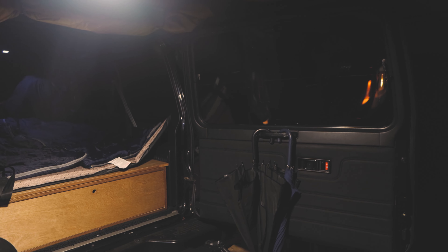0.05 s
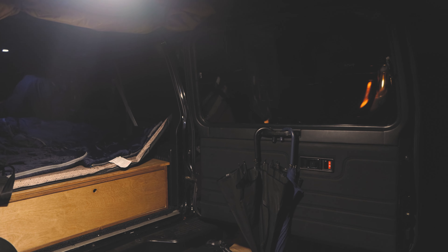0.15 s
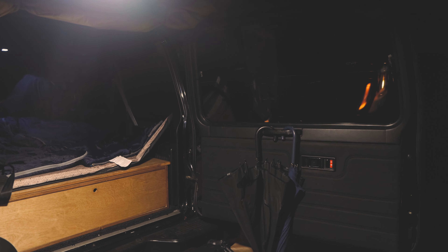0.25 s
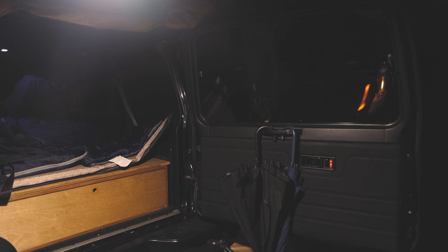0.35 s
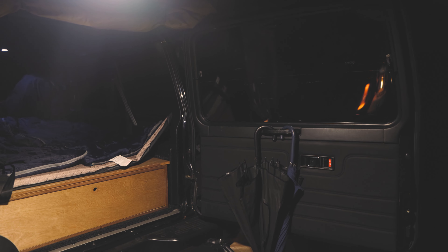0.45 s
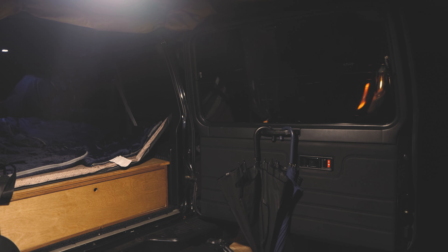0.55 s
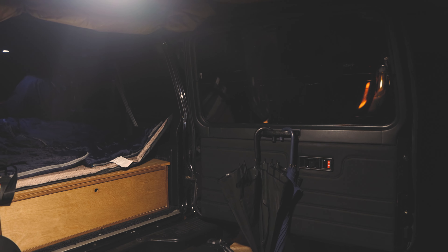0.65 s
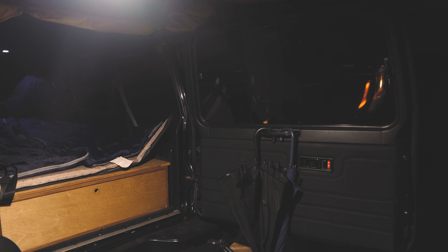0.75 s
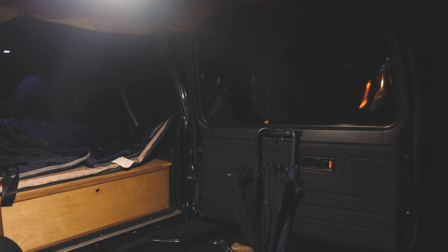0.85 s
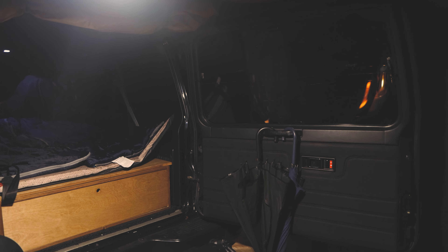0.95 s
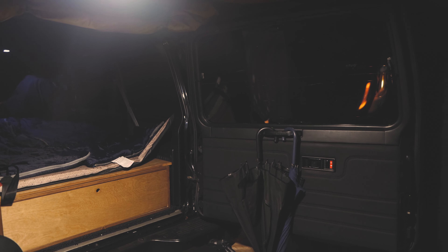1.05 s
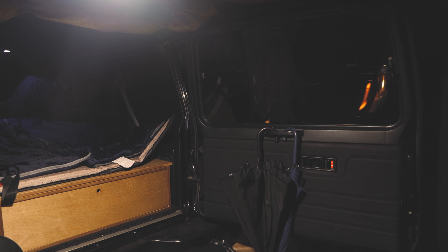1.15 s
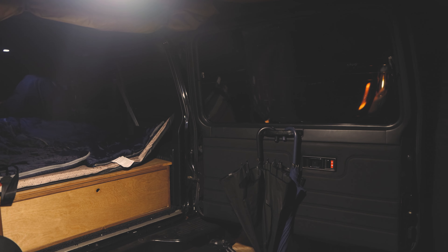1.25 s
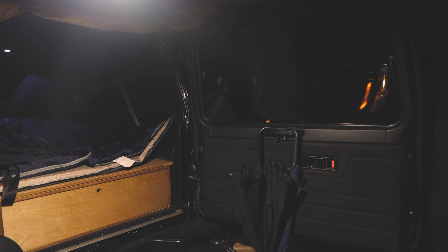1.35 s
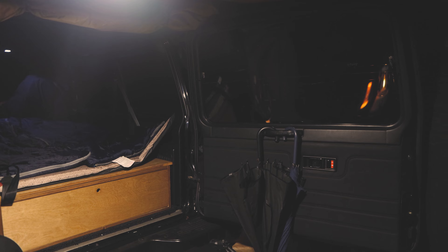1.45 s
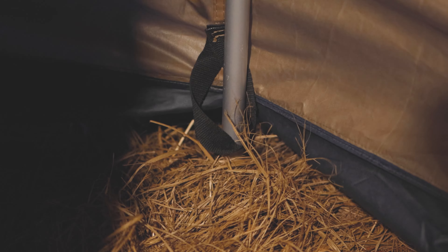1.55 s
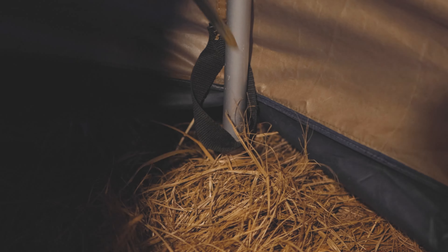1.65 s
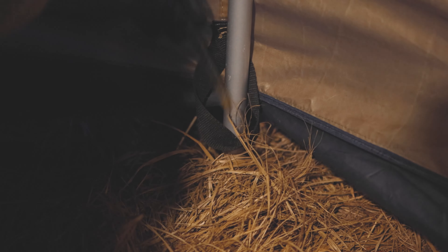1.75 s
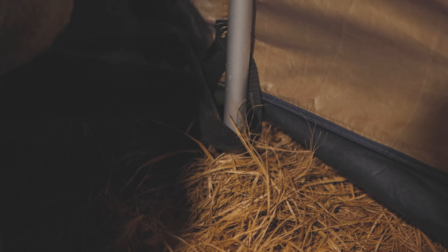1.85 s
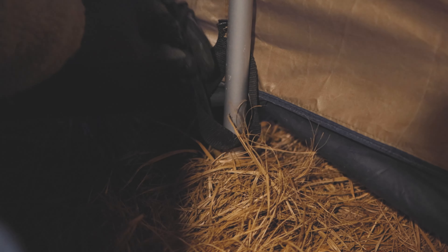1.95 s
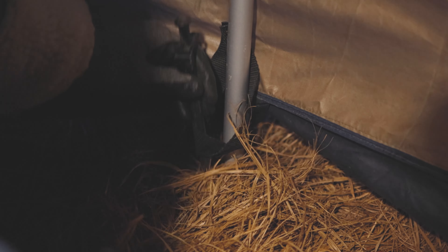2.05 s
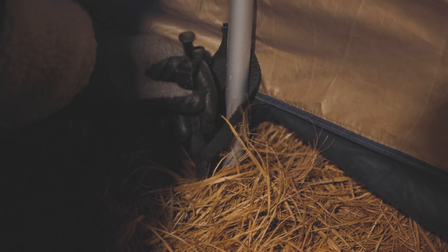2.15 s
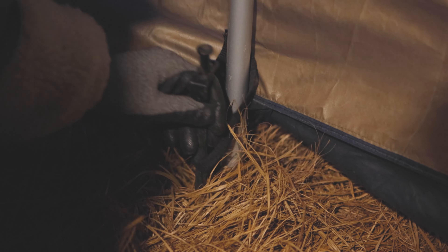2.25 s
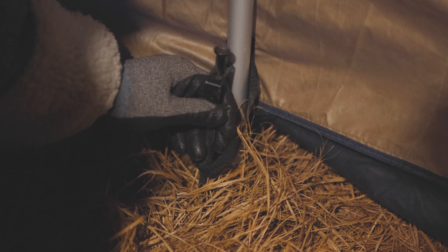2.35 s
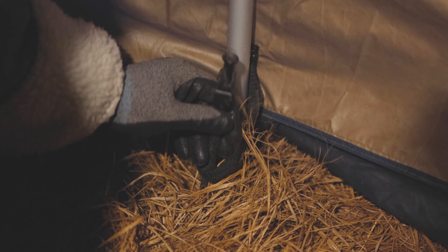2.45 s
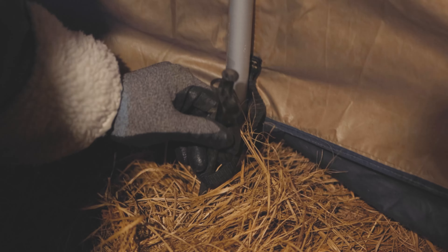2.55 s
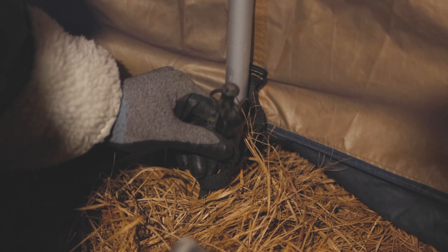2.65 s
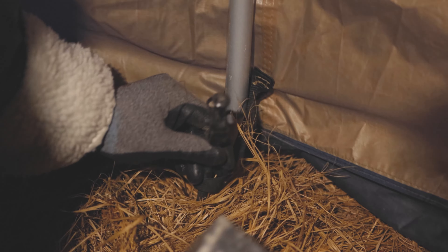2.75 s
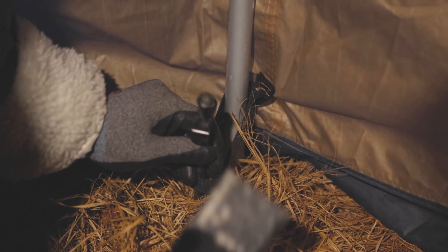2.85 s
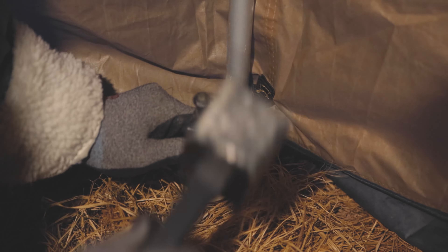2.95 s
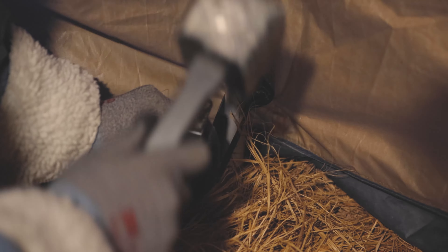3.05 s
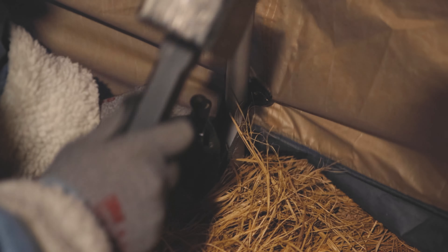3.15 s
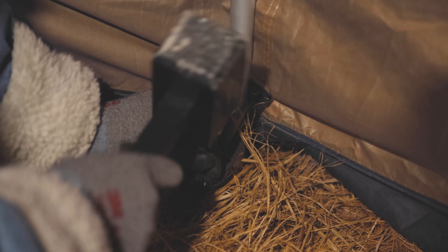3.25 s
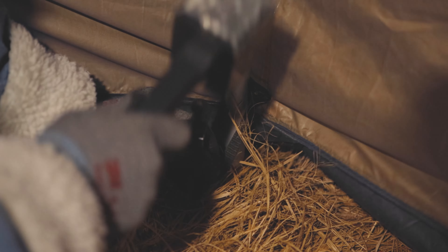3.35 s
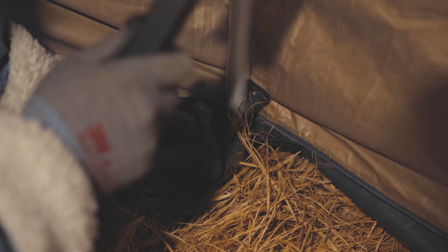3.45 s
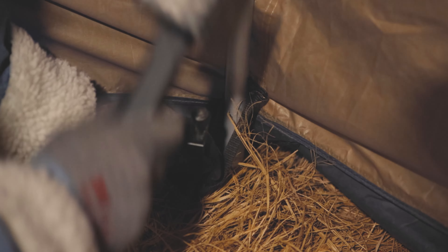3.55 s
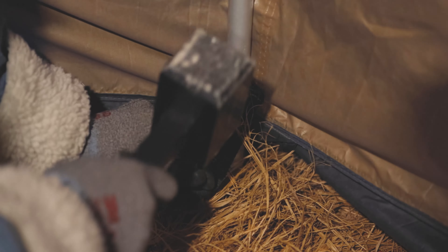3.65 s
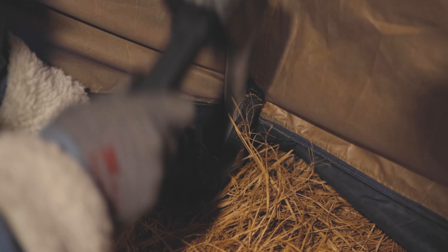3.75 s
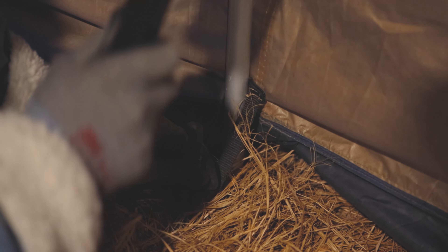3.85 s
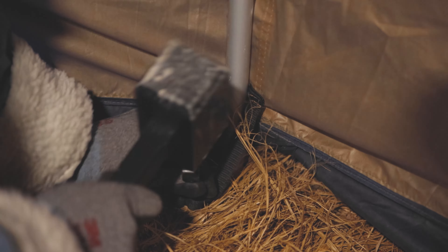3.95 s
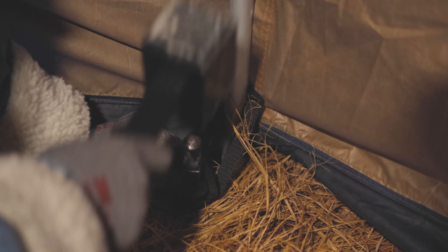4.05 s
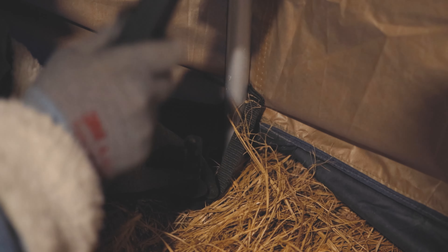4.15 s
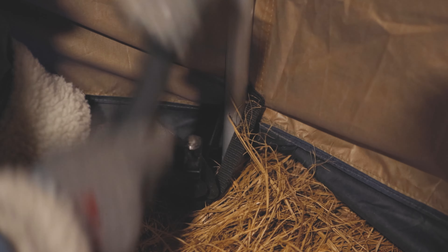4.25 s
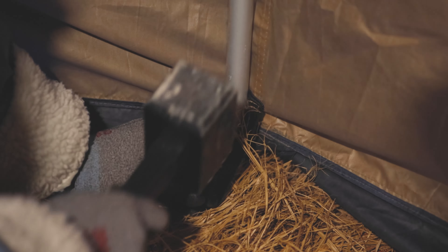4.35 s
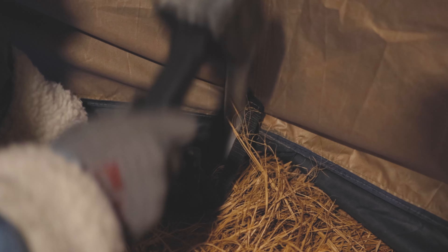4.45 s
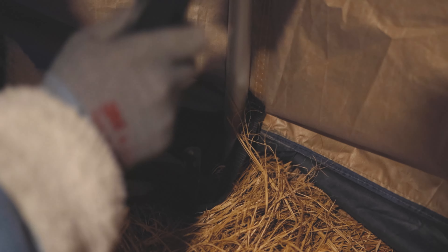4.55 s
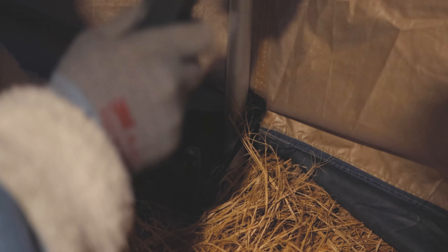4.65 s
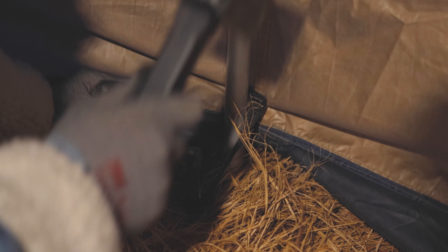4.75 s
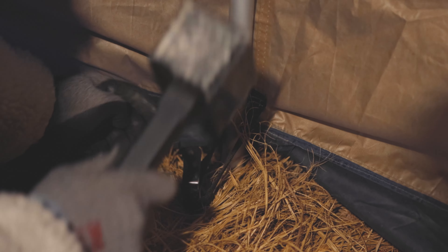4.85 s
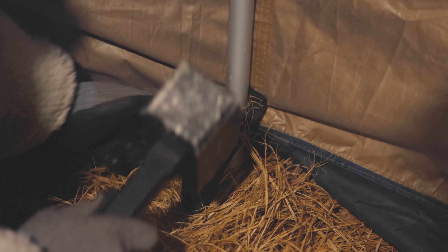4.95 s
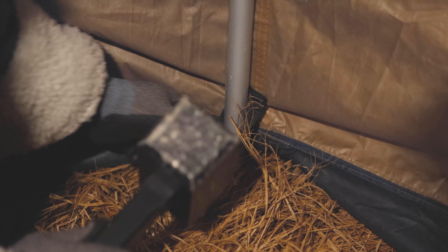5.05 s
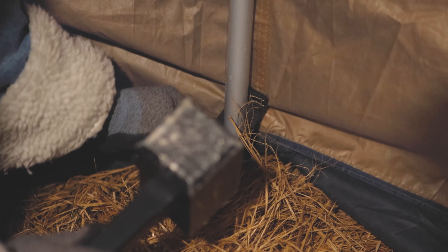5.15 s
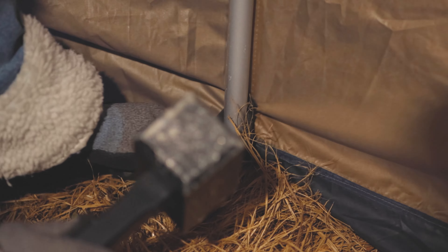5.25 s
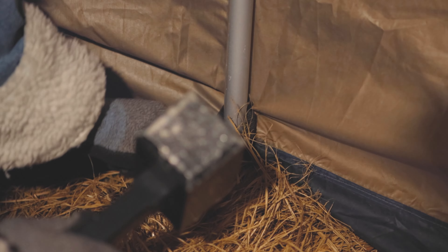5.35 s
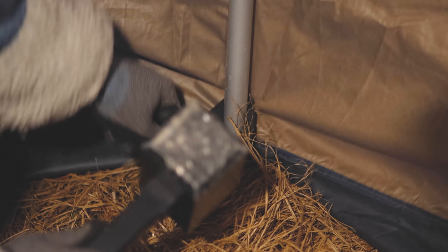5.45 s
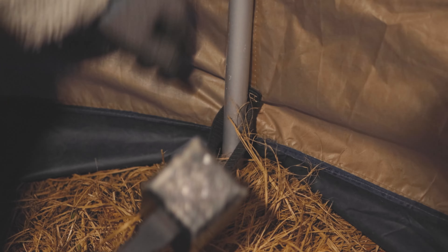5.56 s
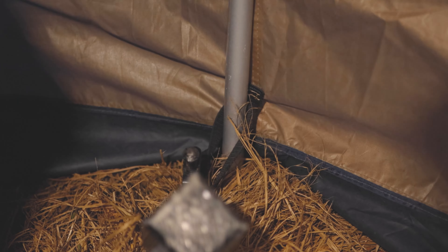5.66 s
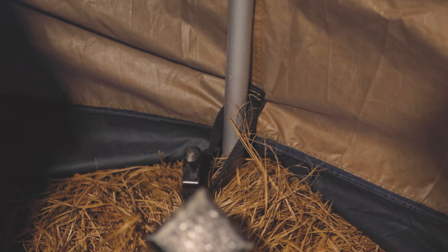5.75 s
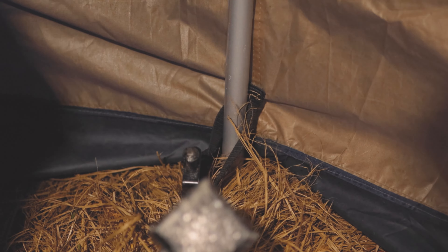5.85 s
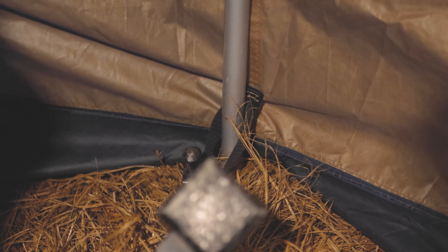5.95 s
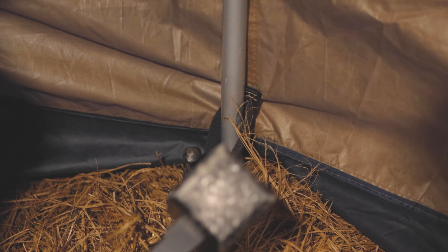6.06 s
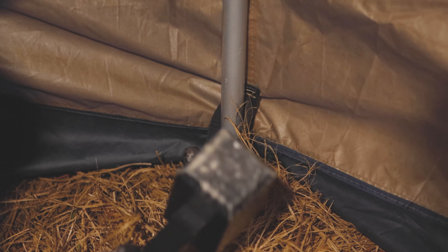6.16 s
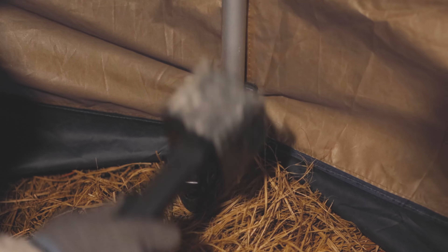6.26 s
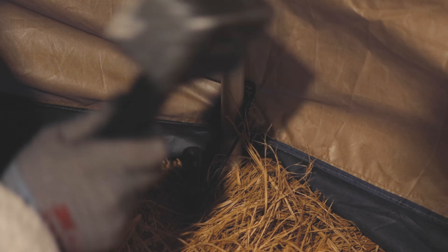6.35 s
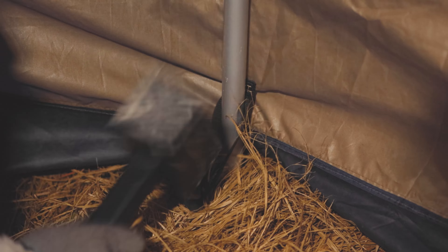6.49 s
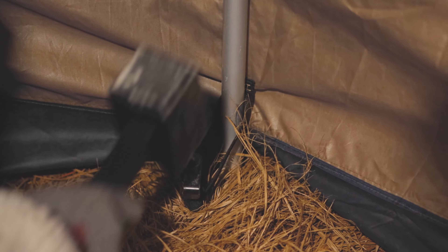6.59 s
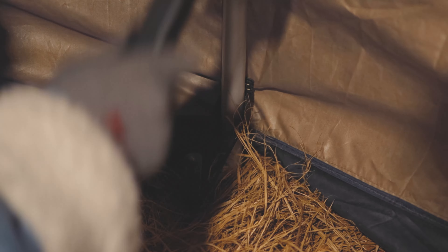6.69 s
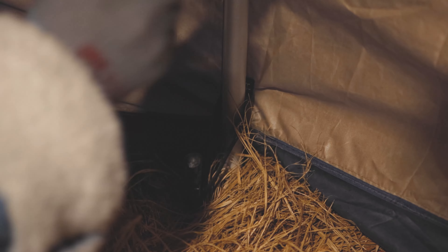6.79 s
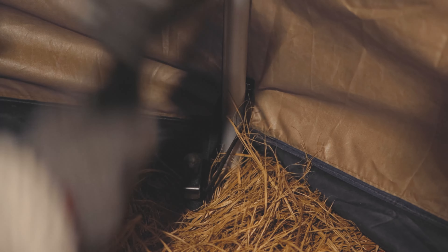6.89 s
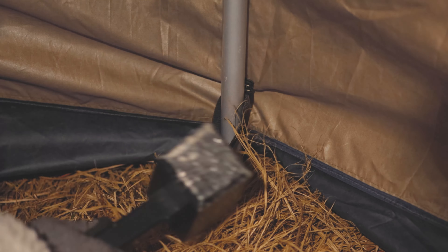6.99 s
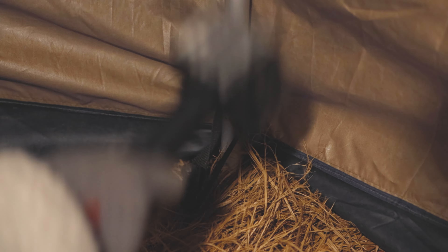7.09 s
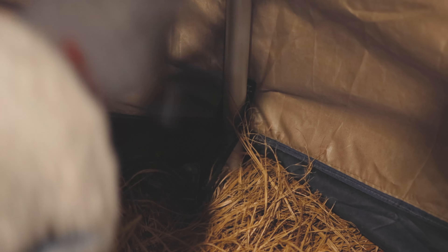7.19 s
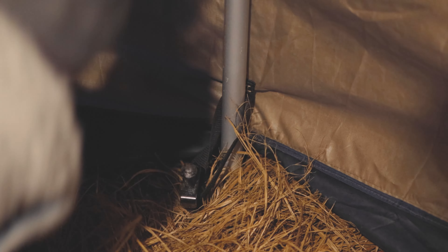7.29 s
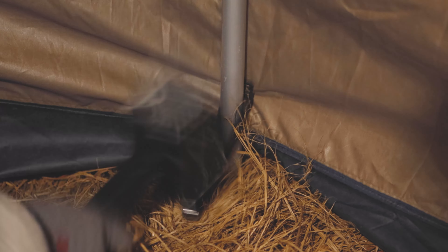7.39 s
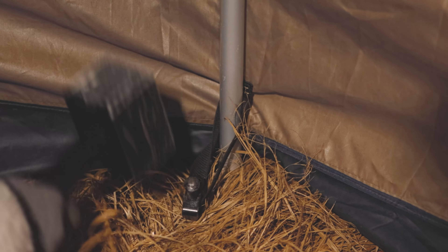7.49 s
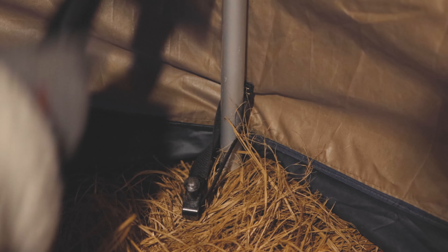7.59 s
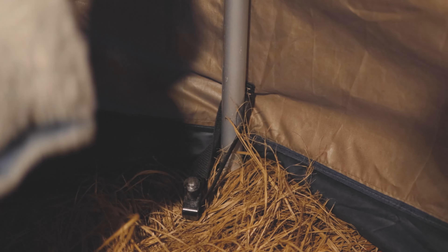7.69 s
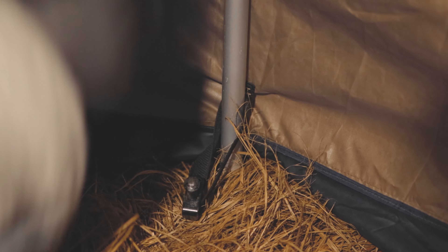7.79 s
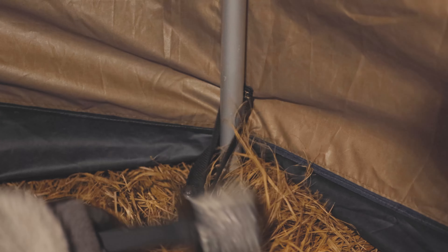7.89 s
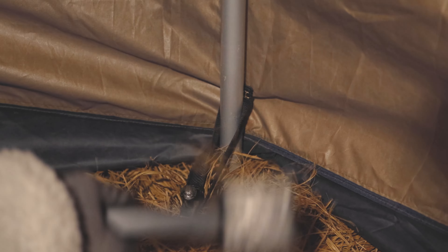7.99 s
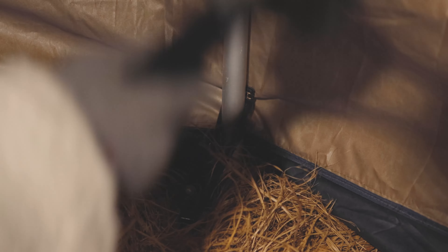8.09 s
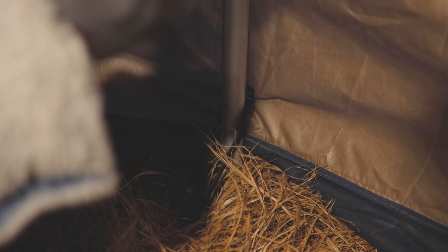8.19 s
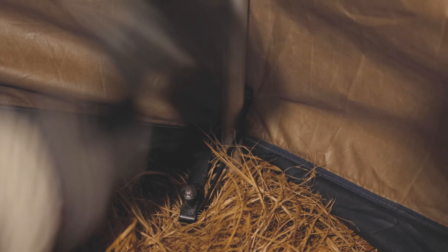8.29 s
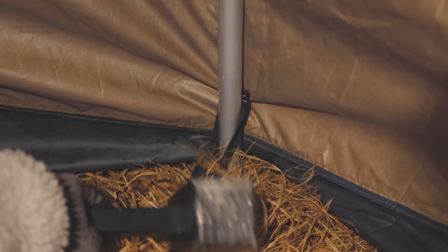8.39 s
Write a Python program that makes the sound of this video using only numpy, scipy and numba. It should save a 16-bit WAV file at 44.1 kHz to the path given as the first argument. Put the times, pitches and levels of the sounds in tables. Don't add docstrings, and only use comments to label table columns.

```python
import sys
import numpy as np
from scipy import signal
from scipy.fft import rfft, irfft, next_fast_len
from scipy.io import wavfile
from scipy.ndimage import uniform_filter1d
from numba import njit

SR = 44100
rng = np.random.default_rng(int(sys.argv[2]) if len(sys.argv) > 2 else 0)


def amplitude_ratio(level_db):
    exponent = np.asarray(level_db, float) / 20
    return 10 ** exponent


def generate_wav(signal):
    frames = np.transpose(np.atleast_2d(signal))
    scaled = np.clip(frames, -1, 1) * 32767
    pcm = np.round(scaled).astype(np.int16)
    wavfile.write(sys.argv[1], SR, pcm)


N = 371718
CUT_S = 1.553
RING_LENGTH = 6000

# [t/s, peak level/dB, mallet ring level/dB, thud level/dB, crack level/dB]
BLOWS = [
    (3.3402, -7.5, -12.5, -22.5, -11),
    (3.7086, -8.5, -13.5, -25, -20),
    (4.0583, -7.5, -16, -33, -24),
    (4.4066, -5, -22, -30.5, -18),
    (6.6099, -10.5, -19, -23, -5),
    (7.0541, -6.5, -19, -27, -8),
    (7.5121, -8.5, -24, -23, -6),
    (7.9861, -9.5, -16, -24.5, -3.5),
]


def curve(table, column):
    rows = np.array(table)
    return np.interp(np.arange(N) / SR, rows[:, 0], rows[:, column])


def coloured(x, colour):
    hz, db = np.transpose(colour)
    size = next_fast_len(len(x))
    log_hz = np.log(np.maximum(np.arange(size // 2 + 1) * SR / size, 1))
    gain = amplitude_ratio(np.interp(log_hz, np.log(hz), db, left=-90, right=-90))
    y = irfft(rfft(x, size) * gain, size)[:len(x)]
    return y / np.std(y)


def walk(rate):
    k = int(SR / rate)
    held = np.repeat(rng.standard_normal(N // k + 1), k)
    return 1.23 * uniform_filter1d(uniform_filter1d(held, k), k)[:N]


def grains(rate, spread_db, smear_s):
    sizes = amplitude_ratio(spread_db * np.minimum(rng.exponential(size=N), 4))
    starts = (rng.random(N) < rate / SR) * sizes
    swell = signal.lfilter([1], [1, -np.exp(-1 / (smear_s * SR))], starts)
    return swell * rng.standard_normal(N)


def ring(modes, scale, scatter_db, wander):
    hz, db, t60 = np.transpose(modes)[:, :, None]
    size = amplitude_ratio(db + scatter_db * rng.standard_normal((len(modes), 1)))
    t = np.arange(RING_LENGTH) / SR
    drift = wander * np.cumsum(rng.standard_normal((len(modes), RING_LENGTH)), axis=1)
    phase = 2 * np.pi * hz * scale * t + drift
    return np.sum(size * np.exp(-np.log(1000) * t / t60) * np.sin(phase), axis=0)


def burst(hz, width, decay_s):
    edges = np.clip([hz / width, hz * width], 20, .45 * SR)
    noise = rng.standard_normal(RING_LENGTH) * np.exp(-np.arange(RING_LENGTH) / (decay_s * SR))
    y = signal.sosfilt(signal.butter(3, edges, "band", fs=SR, output="sos"), noise)
    return y / np.max(np.abs(y))


def add(out, s, x):
    i = int(s * SR)
    out[i:i + len(x)] += x[:len(out) - i]


def after(times, db, fade_s):
    kicks = np.zeros(N)
    np.add.at(kicks, (np.asarray(times) * SR).astype(int), amplitude_ratio(db))
    return signal.lfilter([1], [1, -np.exp(-1 / (fade_s * SR))], kicks)


def chatter(layers, ms, count):
    when = np.sort(rng.random(count))
    size = rng.uniform(0.22, 1, count) * rng.choice([-1, 1], count)
    size[0] = 1
    taps = np.zeros((1, int(.03 * SR)))
    delays = (when - when[0]) * np.clip(ms, 1, 28) * SR / 1000
    np.add.at(taps[0], delays.astype(int), size)
    y = signal.fftconvolve(layers, taps, axes=1)
    return y / np.sqrt(2 * np.mean(y[:, :int(.007 * SR)] ** 2, axis=1, keepdims=True))


def night():
    # [t/s, level/dB]
    hush_levels = [(0, -56), (.45, -53.5), (1.1, -53), (1.55, -53.5)]
    # [f/Hz, density level/dB]
    hush_colour = [(15, -48), (25, -14.5), (134, -7), (276, -14), (615, -13.5), (1520, -17.5), (3660, -31),
                   (8150, -52), (9030, -52), (12000, -73), (15600, -87), (22000, -120)]
    side_db = -1
    mid = coloured(rng.standard_normal(N), hush_colour)
    side = coloured(rng.standard_normal(N), hush_colour)
    side = signal.sosfilt(signal.butter(2, 900, "high", fs=SR, output="sos"), side)
    wide = mid + amplitude_ratio(side_db) * side * np.array([[1], [-1]])
    level = amplitude_ratio(curve(hush_levels, 1) + 0.33 * walk(6.1))
    return wide * level * (np.arange(N) < CUT_S * SR)


def snaps():
    # [t/s, peak level/dB, centre f/Hz, body level/dB]
    cracks = [(0.3794, -51, 2120, -10), (0.7338, -40, 2270, -24), (1.5545, -21, 2500, -16),
              (1.7423, -4.5, 3120, -18.5), (1.77, -19, 3690, -16), (1.907, -24, 1100, -13),
              (1.93, -2.5, 2940, -27), (2.088, -30, 5950, -30), (3, -14, 2780, -16.5),
              (3.2, -19, 1310, -13), (3.2715, -18.5, 2910, -26), (3.4446, -6.5, 2650, -24),
              (5.012, -30.5, 1600, -9), (5.1864, -28, 2020, -10), (5.232, -29, 2500, -12),
              (5.2535, -29, 3000, -15), (5.265, -29, 2500, -10), (5.5858, -30, 1410, -11),
              (5.8911, -31, 1500, -12), (6.099, -32, 3000, -22), (6.628, -29, 450, 0),
              (6.642, -31.5, 450, 1), (7.104, -23, 2830, -12), (7.5652, -20, 2890, -10.5),
              (8.056, -30.5, 1410, -21)]
    # [t/s, starting f/Hz, pitch fall time/s, level/dB]
    cord_twang = (3.909, 1250, .035, -37)
    out = np.zeros(N)
    for s, db, hz, body_db in cracks:
        if s > CUT_S:
            tail = amplitude_ratio(-12.5) * burst(hz, 1.74, 0.0078)
        else:
            tail = amplitude_ratio(-7.5) * burst(hz, 2.0, 0.031)
        body = amplitude_ratio(body_db + 1.5) * burst(324, 2.17, 0.0044)
        add(out, s + 0.00046, amplitude_ratio(db + 4.0) * (burst(hz, 1.48, 0.00021) + tail + body))
    s, hz, fall_s, db = cord_twang
    fade = np.exp(-np.arange(RING_LENGTH) / (fall_s * SR))
    add(out, s, amplitude_ratio(db) * fade * np.sin(2 * np.pi * np.cumsum(hz * fade) / SR))
    return out


def hands():
    # [t/s, rustle level/dB, cloth sizzle level above rustle/dB]
    handling = [(1.56, -35.5, -5), (1.7, -39.5, -4.5), (1.92, -42, -4), (2.08, -49.5, -3.5),
                (2.55, -42.5, -9), (3.21, -33.5, -11), (3.36, -38.5, -7), (3.62, -39.5, -10),
                (3.85, -46, -7.5), (4.38, -44, -12), (4.53, -55, -9), (4.9, -47.5, -12.5),
                (5.25, -45.5, -11.5), (5.4, -35.5, -15.5), (5.62, -44.5, -9), (6.55, -45.5, -10.5),
                (7.0, -47.5, -9.5), (8.3, -50.5, -11.5)]
    # [t/s, level/dB]
    gusts = [(1.56, -38.5), (2.16, -45), (3.06, -37), (3.66, -44.5), (4.56, -48), (5.16, -45),
             (5.46, -39.5), (6.36, -39.5), (6.66, -43.5), (7.26, -43.5), (7.56, -46), (7.9, -41)]
    # [f/Hz, density level/dB]
    rustle_colour = [(120, -15), (200, 2), (242, -1), (392, -0.5), (729, -2), (1180, -1), (1550, -2.5),
                     (5000, -20), (6500, -28), (11000, -120)]
    # [f/Hz, density level/dB]
    sizzle_colour = [(2060, -5), (3500, -2.5), (4530, -4.5), (4920, -4), (10300, -16.5), (13400, -18),
                     (15400, -22), (16300, -28)]
    # [f/Hz, density level/dB]
    breeze_colour = [(12, -55), (20, -29), (66, -2), (108, 3.5), (202, -4.5), (236, -21), (268, -15),
                     (300, -24), (390, -45), (660, -120)]
    crackle = grains(1100, 2.4, 0.0021)
    crackle = crackle / np.std(crackle)
    patchy_db = 1.64 * walk(25)
    shake = after(np.array(BLOWS)[:, 0], -43.5, 0.06)
    rustle = amplitude_ratio(curve(handling, 1) + 2.5 + patchy_db + 0.46 * walk(12))
    sizzle = (amplitude_ratio(curve(handling, 1) + curve(handling, 2) + 2.2) + shake) * amplitude_ratio(patchy_db)
    low = coloured(crackle + 0.87 * rng.standard_normal(N), rustle_colour) * rustle
    high = coloured(crackle + 1.08 * rng.standard_normal(N), sizzle_colour) * sizzle
    swipe = swipes(crackle + 0.97 * rng.standard_normal(N))
    breeze_level = amplitude_ratio(curve(gusts, 1) + 0.2 + 2.56 * walk(6.4))
    breeze = coloured(rng.standard_normal(N), breeze_colour) * breeze_level
    return (low + high + swipe + breeze) * (np.arange(N) >= CUT_S * SR)


def swipes(grit):
    # [start t/s, fullest t/s, end t/s, level/dB]
    strokes = [
        (1.77, 1.8, 1.86, -39),
        (3.388, 3.466, 3.49, -30),
        (5.305, 5.466, 5.51, -38.5),
        (5.894, 5.96, 5.98, -30),
    ]
    # [f/Hz, density level/dB]
    stroke_colour = [(300, -36), (900, -2), (2000, 1.5), (5000, -5), (10000, -12.5), (15800, -15)]
    # [start t/s, end t/s, starting f/Hz, final f/Hz, level/dB]
    cord_zip = (5.895, 6, 261, 1901, -29.5)
    edge = 0.54
    t = np.arange(N) / SR
    swell = np.zeros(N)
    for start, full, end, db in strokes:
        swell += amplitude_ratio(db) * np.interp(t, [start, full, end], [0, 1, 0]) ** edge
    out = swell * coloured(grit, stroke_colour)
    start, end, from_hz, to_hz, db = cord_zip
    hz = np.linspace(from_hz, to_hz, int((end - start) * SR))
    phase = np.cumsum(2 * np.pi * hz / SR + 0.197 * rng.standard_normal(len(hz)))
    broken = amplitude_ratio(db + 5 * walk(154)[:len(hz)])
    add(out, start, broken * np.hanning(len(hz)) ** 0.23 * np.sin(phase))
    return out


def jingles():
    # [t/s, ring level/dB, clank level/dB, brightness level/dB]
    knocks = [(2.316, -24.5, -21, -11.5), (3.305, -13.5, -11, -8), (3.575, -16, -8, -3.5),
              (3.583, -26, -6, -0.5), (3.653, -26, -2, -1), (3.796, -37.5, 9.5, -17),
              (3.992, -25.5, -3, -11), (4.258, -34.5, -12, -6), (4.311, -28, 4.5, 3),
              (4.665, -22.5, -6, -9), (5.151, -31.5, -8, 0), (5.619, -24.5, -4.5, -14.5),
              (6.394, -34, 3, -11), (6.51, -18, -18, -33), (6.519, -28, -4, -21), (6.593, -18, 1, -22),
              (6.686, -31, 2.5, -3.5), (6.867, -26.5, -5, -0.5), (6.895, -31, -7, -12),
              (7.403, -24.5, -11, -14), (7.5231, -10, -10, -14), (7.565, -21.5, -24, -20),
              (7.744, -33.5, 3, -10), (7.894, -23, -4, -17), (7.912, -22, -18, -13), (7.961, -36.5, 6, 2),
              (8.183, -37, -4, -9), (8.358, -23.5, -13.5, -7.5)]
    # [t/s, ring level/dB, clank level/dB, brightness level/dB]
    drags = [(3.296, -20.5, 0, -8), (3.554, -29, -18, -27), (3.565, -27, -12, -3), (3.6, -42, -6, 3),
             (3.646, -25, -7, -15), (3.954, -33, -6, -21), (3.968, -22.5, -3, -3), (4.649, -30.5, -8, -9),
             (5.138, -27.5, -2, -9), (5.859, -38, -15, -11), (6.502, -29.5, -14, -10.5),
             (6.5823, -19, -2, -3.5), (6.854, -33, -1, -3), (6.861, -22, -9, -23), (7.043, -37.5, 9, -15),
             (7.239, -37, -4, -8.5), (7.369, -29.5, -2, -1), (7.501, -38.5, 9, -21), (7.615, -33.5, -2, -9),
             (7.626, -28.5, -6, -9.5), (7.649, -29.5, 0.5, -19), (7.874, -32, -5, -18),
             (7.881, -30.5, 0, -16), (8.055, -45, 11.5, 7), (8.105, -22, -10, -21), (8.328, -31.5, -4, -11)]
    # [t/s, ring level/dB]
    tinks = [(2.572, -30.5), (2.642, -34.5), (3.255, -25), (3.908, -37), (4.211, -41), (4.438, -41),
             (4.474, -38), (4.535, -47), (4.621, -36), (4.696, -32.5), (4.744, -34.5), (4.766, -47),
             (4.869, -29.5), (5.04, -39.5), (5.762, -38), (6.055, -33.5), (6.087, -34), (6.164, -44),
             (6.314, -34), (6.756, -34), (6.78, -30), (7.579, -33), (8.157, -30.5), (8.405, -36)]
    # [f/Hz, level/dB, t60/s]
    hook_modes = [(2917, -8, 0.071), (2981, -7, 0.033), (2890, -42, 0.054), (3210, -10, 0.014),
                  (3870, -27, 0.097)]
    # [f/Hz, level/dB, t60/s]
    upper_modes = [(6910, 5, 0.042), (7635, -0.5, 0.058)]
    # [f/Hz, level/dB, t60/s]
    top_modes = [(10840, -23, 0.19), (11880, -8.5, .03), (14000, -8, 0.055), (15000, -30, .03)]
    knock_ms, drag_ms, tink_ms = 2.4, 8, 3.2
    rebound_s, rebound = 0.012, (-15.5, -1, -16)
    tremble_db, tremble_fade_s, tremble_max_db, tremble_rest_db = -21, 0.1, -46, -72
    hits = [(blow[0] + rebound_s, *rebound, knock_ms) for blow in BLOWS[1:]]
    hits += [(*row, knock_ms) for row in knocks]
    hits += [(*row, drag_ms) for row in drags]
    hits += [(*row, -7, -20, tink_ms) for row in tinks]
    out = np.zeros(N)
    for s, db, clank_db, bright_db, ms in hits:
        shift = 1 + 0.0218 * rng.standard_normal()
        main = ring(hook_modes, shift, 6.1, 0.06)
        clank = burst(2260, 2.02, 0.0055)
        upper = ring(upper_modes, 0.97, 1.4, 0.16) + 0.32 * burst(4700, 1.33, 0.0014)
        top = ring(top_modes, 1, 10.0, 0.015) + 2.5 * burst(11400, 1.36, 0.0011)
        layers = np.array([main, clank, upper, top])
        gains = amplitude_ratio(db + np.array([-.3, clank_db - 2.5, bright_db - .4, bright_db - 6.5]))
        add(out, s, gains @ chatter(layers, 1.8 * ms, count=8))
    ticks = coloured(grains(200, 3.0, 0.0015), [(1800, -14), (2900, -12), (4600, -11)])
    hum = np.zeros(N)
    for hz, width_hz in [(2860, 74), (3000, 68)]:
        hum += signal.lfilter(*signal.iirpeak(hz, hz / np.clip(width_hz, 100, 300), SR), ticks)
    times, levels_db = np.transpose(hits)[:2]
    tremble = after(times, levels_db + tremble_db, tremble_fade_s) + amplitude_ratio(tremble_rest_db)
    tremble = np.minimum(tremble, amplitude_ratio(tremble_max_db)) * (np.arange(N) > 2.2 * SR)
    return out + tremble * hum / np.std(hum)


def squeaks():
    # [start t/s, end t/s, f/Hz, level/dB]
    whistles = [
        (2.332, 2.43, 12000, -56),
        (2.837, 2.87, 12100, -56),
        (3.445, 3.553, 12200, -52),
    ]
    # [start t/s, end t/s, level/dB]
    creaks = [
        (6.723, 6.745, -37),
        (6.793, 6.853, -40),
    ]
    out = np.zeros(N)
    for start, end, hz, db in whistles:
        noise = rng.standard_normal(int((end - start) * SR))
        whistle = signal.lfilter(*signal.iirpeak(hz, 30, SR), noise)
        add(out, start, amplitude_ratio(db + 19) * np.hanning(len(noise)) ** .4 * whistle)
    for start, end, db in creaks:
        gaps = .0028 + 0.0036 * rng.random(30)
        sizes = rng.standard_normal(30)
        for s, size in zip(start + np.cumsum(gaps) - gaps[0], sizes):
            if s < end:
                add(out, s, amplitude_ratio(db + 3 * size) * burst(11800, 1.3, 0.00037))
    return out


def blows():
    # [ratio to ring f, level/dB, t60/s]
    peg_modes = [(1, -6, 0.028), (0.88, -8, 0.0086), (1.2, -11, 0.02), (.985, -21.5, 0.12)]
    # [f/Hz, level/dB, t60/s]
    mallet_modes = [(12900, 0, .028), (13250, -8, .05), (14900, -14, .02), (10680, -38, .2)]
    # [f/Hz, level/dB, t60/s]
    ground_modes = [(63.7, 3, 0.09), (137, 6.5, 0.046), (337, 9, 0.023)]
    peg_hz, peg_rise_hz_per_s = 2928, 20.1
    out = np.zeros(N)
    for s, db, mallet_db, thud_db, crack_db in BLOWS:
        hz = peg_hz + peg_rise_hz_per_s * (s - BLOWS[0][0])
        hit = ring(peg_modes, hz, 0.58, 0.085)
        hit += amplitude_ratio(mallet_db) * ring(mallet_modes, 1.0, 0.77, 0.022)
        hit += amplitude_ratio(mallet_db - 25) * burst(13140, 1.045, 0.038)
        hit += amplitude_ratio(thud_db - 4.5) * ring(ground_modes, 1, 1.5, .03)
        hit += amplitude_ratio(thud_db + 23.5) * burst(1650, 2.64, 0.0023)
        hit += amplitude_ratio(crack_db - 0.5) * burst(5400, 2.87, 0.002)
        hit += amplitude_ratio(crack_db - 12.5) * burst(2300, 2.7, 0.017)
        add(out, s + 0.00033, amplitude_ratio(db + 15.5) * hit)
    return out


def scene():
    return night() + snaps() + hands() + jingles() + squeaks() + blows()


@njit
def follow(x, attack, release):
    e, out = 0., np.empty(len(x))
    for i in range(len(x)):
        e += (x[i] - e) * (attack if x[i] > e else release)
        out[i] = e
    return out


def top_cut(x):
    return signal.sosfilt(signal.butter(12, 16970, fs=SR, output="sos"), x)


def record(dry):
    ceiling = .45
    clipped = dry / (1 + np.abs(dry / ceiling) ** 4) ** .25
    level = follow(np.abs(clipped[0]), 1 / (.014 * SR), 1 / (.04 * SR))
    ducked = clipped * np.minimum(1, .075 / (level + 1e-9))
    mix = signal.sosfilt(signal.ellip(6, .3, 45, 15900, fs=SR, output="sos"), ducked)
    return top_cut(mix)


dry = scene()
out = record(dry)
generate_wav(out)
```